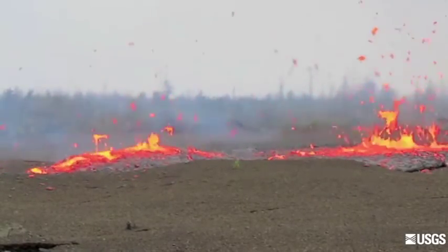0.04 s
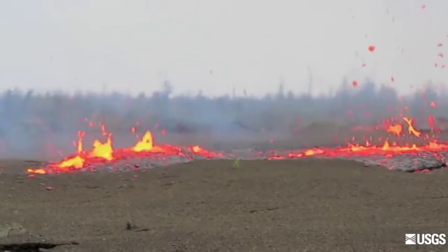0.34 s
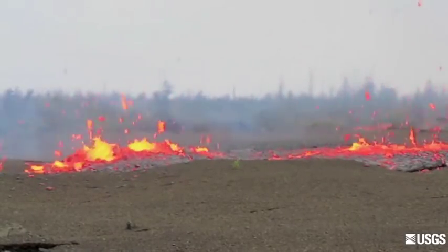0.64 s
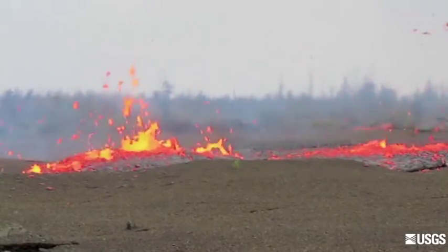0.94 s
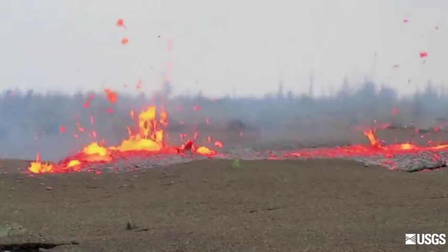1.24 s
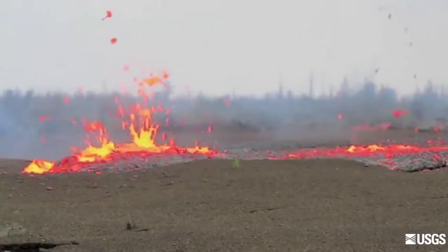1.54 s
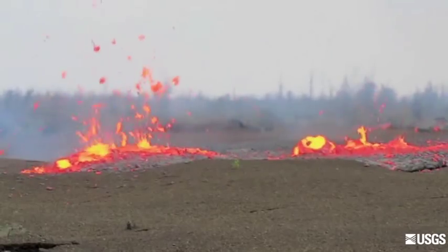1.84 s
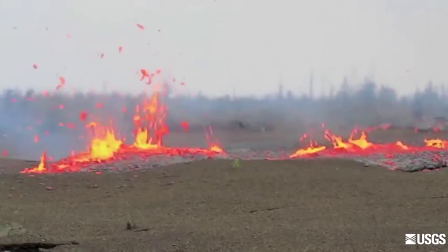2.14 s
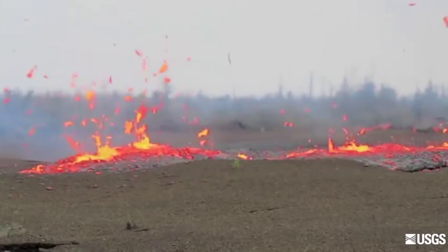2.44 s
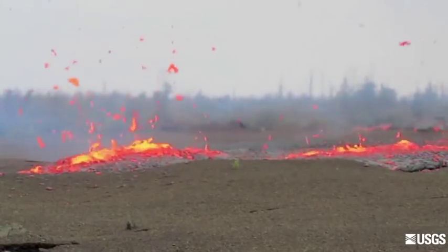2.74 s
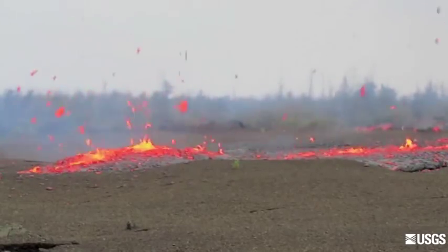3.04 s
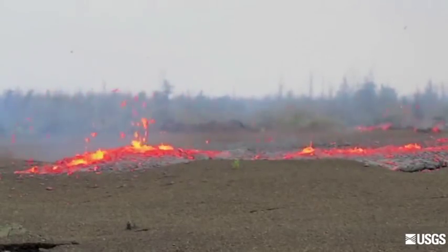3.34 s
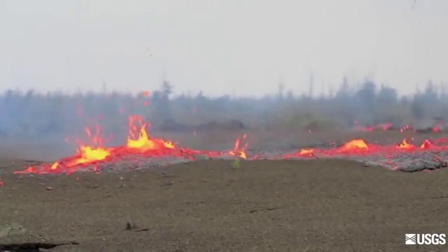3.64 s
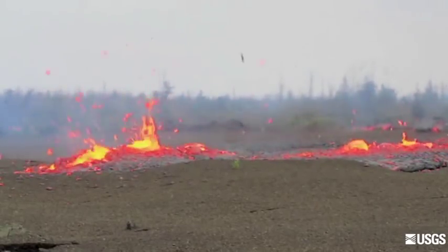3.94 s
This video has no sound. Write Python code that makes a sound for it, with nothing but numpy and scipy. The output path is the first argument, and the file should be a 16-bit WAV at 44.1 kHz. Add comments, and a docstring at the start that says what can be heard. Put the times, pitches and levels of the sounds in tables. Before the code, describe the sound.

Spattering lava roars and hisses from a fissure, with low wind rumble on the microphone.

```python
"""A steady roar of escaping gas, from a lava fissure some way off across open ground.
Each bursting slug adds a short hissing jet; roar and jets are noise, grainy with pops of spatter.
A deep rumble lies underneath, drops away abruptly at 1.4 s and creeps back faintly near the end.
Wind buffets the microphone in low puffs over a faint breeze."""
import sys
import numpy as np
from scipy import signal
from scipy.fft import rfft, irfft
from scipy.io import wavfile

SR = 44100
rng = np.random.default_rng(int(sys.argv[2]) if len(sys.argv) > 2 else 0)


def transcribe(signal):
    """Save signal, clipped to [-1, 1], as a 16-bit WAV file at the path in sys.argv[1]."""
    frames = np.atleast_2d(signal).T
    limited = np.clip(frames, -1, 1)
    pcm = np.round(limited * 32767).astype(np.int16)
    wavfile.write(sys.argv[1], SR, pcm)


N = 4 * SR


def amp(db):
    """Decibels to gain."""
    return 10 ** (np.asarray(db) / 20)


def unit(x):
    """Scales to rms 1."""
    return x / np.sqrt(np.mean(x ** 2) + 1e-20)


def spectrum(points, hz):
    """Gain of an (f/Hz, level/dB) table, interpolated in log frequency."""
    f, db = np.transpose(points)
    return amp(np.interp(np.log(hz + 1), np.log(f + 1), db))


def coloured(x, points):
    """Filters x by an (f/Hz, level/dB) table."""
    return irfft(rfft(x) * spectrum(points, np.fft.rfftfreq(N, 1 / SR)), N)


def hump(hz, centre_hz, fall_db):
    """Gain of a broad band, fall_db down one octave from its centre."""
    return amp(-fall_db * np.log2((hz + 1) / centre_hz) ** 2)


def smooth(x, width, axis):
    """Gaussian blur over a width in steps, scaled to rms 1."""
    n = x.shape[axis]
    kernel = np.exp(-(2 * np.fft.rfftfreq(n) * width) ** 2)
    blurred = irfft(rfft(np.moveaxis(x, axis, -1)) * kernel, n)
    return unit(np.moveaxis(blurred, -1, axis))


def random_field(hz, t, width_hz, width_s):
    """Smooth random pattern over frequency and time, rms 1."""
    drift = smooth(rng.standard_normal((len(hz), len(t))), width_s / t[1], axis=1)
    return smooth(drift, width_hz / hz[1], axis=0)


# Breeze spectrum: f/Hz, level/dB
BREEZE_SPECTRUM = [(15, -16), (35, -12), (90, -10), (200, 6), (400, -4), (900, -14), (3000, -45)]


def breeze(level_db=-61.5):
    """Faint steady air noise, independent in each channel."""
    return amp(level_db) * unit(coloured(rng.standard_normal((2, N)), BREEZE_SPECTRUM))


# Eddies at the microphone: peak t/s, length/s, relative level/dB, centre f/Hz
EDDIES = [(0.164, 0.097, -37, 60), (0.255, 0.08, -45, 120), (0.381, 0.069, -38, 78), (0.504, 0.03, -30, 94),
          (0.598, 0.12, -36, 84), (0.807, 0.055, -37, 67), (0.961, 0.082, -31, 95),
          (0.999, 0.022, -26, 114), (1.132, 0.021, -20, 90.5), (1.211, 0.055, -34, 103),
          (1.374, 0.038, -25, 100), (1.424, 0.02, -28, 108), (1.749, 0.032, -46, 150),
          (1.855, 0.079, -46.5, 162), (1.972, 0.014, -40, 320), (2.082, 0.096, -43, 240),
          (2.158, 0.016, -28, 252), (2.221, 0.1, -46, 180), (2.386, 0.089, -46, 170),
          (2.5, 0.031, -51, 180), (2.603, 0.074, -43, 200), (2.667, 0.078, -43, 192),
          (2.824, 0.068, -35.5, 217), (2.987, 0.036, -38, 220), (3.18, 0.098, -49, 180),
          (3.325, 0.052, -41, 212), (3.424, 0.084, -50, 46), (3.933, 0.099, -52, 63)]


def wind_buffets(gain_db=4.5, common_db=-17.5, size=16384):
    """Each eddy hits the microphone as a short low puff, mostly opposite in the two channels."""
    t = (np.arange(size) - size // 2) / SR
    hz = np.fft.rfftfreq(size, 1 / SR)
    out = np.zeros((2, N + 2 * size))
    for peak_s, length_s, db, centre_hz in EDDIES:
        noise = irfft(rfft(rng.standard_normal((2, size))) * hump(hz, centre_hz, fall_db=5.5), size)
        bell = .5 ** (2 * (t / length_s) ** 2)
        rms = amp(gain_db + db) * np.sqrt(np.mean(bell ** 2))
        opposite, common = [rms * unit(n * bell) for n in noise]
        start = round(peak_s * SR) + size // 2
        out[:, start:start + size] += np.array([opposite, -opposite]) + amp(common_db) * common
    return out[:, size:size + N]


# Rumble envelope: t/s, level/dB
RUMBLE_ENVELOPE = [(0, -28), (.6, -27.5), (1.0, -28.5), (1.375, -27.5), (1.405, -50), (1.44, -40),
                   (1.46, -67), (1.6, -79), (1.72, -64), (1.77, -82), (3.3, -78), (3.38, -56), (3.54, -67),
                   (3.7, -51), (3.93, -42), (4, -41)]
# Rumble spectrum: f/Hz, level/dB
RUMBLE_SPECTRUM = [(15, -26), (30, -8), (55, -6.5), (85, -0.5), (110, -1), (138, 1), (190, -1), (230, -1.5),
                   (262, 2), (310, 0), (450, -4), (620, -4), (900, -17), (1600, -35), (4000, -70)]


def rumble():
    """Deep noise, the same in both channels."""
    level_db = np.interp(np.arange(N) / SR, *np.transpose(RUMBLE_ENVELOPE))
    return unit(coloured(rng.standard_normal(N), RUMBLE_SPECTRUM)) * amp(level_db)


def spatter(pops_per_s=2200, pop_share=0.23, spread_db=2):
    """Turbulent noise mixed with dense pops of tearing lava."""
    sizes = amp(spread_db * np.minimum(rng.exponential(1, N), 4)) * rng.choice([-1, 1], N)
    pops = sizes * (rng.random(N) < pops_per_s / SR)
    return np.sqrt(pop_share) * unit(pops) + np.sqrt(1 - pop_share) * rng.standard_normal(N)


def mottled(x, depth_db=1.14):
    """Lifts and lowers narrow bands at random, drifting slowly over time."""
    hz, t, bands = signal.stft(x, SR, nperseg=2048)
    gain = amp(depth_db * random_field(hz, t, width_hz=70, width_s=0.14))
    return signal.istft(bands * gain, SR, nperseg=2048)[1][:N]


# Vent spectrum across the ground: f/Hz, level/dB
VENT_SPECTRUM = [(30, -64), (70, -46), (130, -30.5), (250, -16.5), (400, -13), (560, -7.5), (740, -2),
                 (1000, -2.5), (1550, -.5), (2000, -4.5), (2600, -5.5), (3350, -8), (3800, -14),
                 (4150, -16), (4700, -12), (5450, -10.5), (6400, -12), (7600, -13.5), (10000, -20),
                 (12200, -28), (14500, -37.5)]
# Stereo side relative to mid: f/Hz, level/dB
VENT_SIDE = [(100, 0), (400, -17.5), (800, -17), (1400, -30), (2200, -22.5), (3100, -51.5), (4300, -15),
             (6000, -19), (8500, -13), (11000, -10), (14000, -28)]


def vent_noise():
    """Distant spatter in stereo; the ground cuts a notch near 4 kHz."""
    mid, side = [unit(coloured(mottled(spatter()), VENT_SPECTRUM)) for _ in range(2)]
    side = coloured(side, VENT_SIDE)
    return [mid + side, mid - side]


# Gas roar: t/s, relative level/dB, tilt above pivot/(dB/octave)
ROAR_ENVELOPE = [(0.0, -0.4, 0.6), (0.2, 0.3, 0.04), (0.7, -0.8, 1.2), (0.9, -1, 0), (1.35, 0.1, -0.84),
                 (1.68, -3.5, 0.64), (1.85, 0, 0.3), (2.02, -0.6, -0.7), (2.2, 0.5, -1.2), (2.32, -2, -0.6),
                 (2.5, -1.4, 0.8), (2.7, -1.5, -0.9), (2.95, 0, -0.3), (3.25, -1.3, -0.6), (3.37, -3, -0.5),
                 (3.52, -2, 1), (3.82, -3.5, 0.5), (4.0, -1.5, 2.7)]
# Roar colour on top of the vent spectrum: f/Hz, level/dB
ROAR_SPECTRUM = [(200, 2.5), (750, 1), (1250, -2.8), (1800, -3.1), (2800, -1.5), (4400, -3), (6600, -2.5),
                 (10000, -3.5)]


def gas_roar(hz, t, gain_db=-0.27, pivot_hz=1000):
    """Power gain (frequency x time) of steadily escaping gas, wavering in level and brightness."""
    times, level_db, tilt = np.transpose(ROAR_ENVELOPE)
    octaves = np.log2(np.maximum(hz / pivot_hz, 1))[:, None]
    gain = amp(gain_db + np.interp(t, times, level_db) + octaves * np.interp(t, times, tilt))
    return (gain * spectrum(ROAR_SPECTRUM, hz)[:, None]) ** 2


# Bursting gas slugs: peak t/s, length/s, relative level/dB, centre f/Hz
SLUG_BURSTS = [(0.063, 0.034, -2.0, 1570), (0.09, 0.018, 2.3, 2380), (0.127, 0.056, 7, 6400),
               (0.28, 0.076, 4, 7300), (0.288, 0.044, 2, 1680), (0.365, 0.027, 4.5, 5970),
               (0.428, 0.018, 0, 4470), (0.55, 0.15, -1.0, 2570), (0.571, 0.02, 3.4, 4630),
               (0.605, 0.022, -1, 4990), (0.68, 0.023, 3, 720), (0.766, 0.043, -0.7, 2760),
               (0.828, 0.049, -1, 6350), (0.941, 0.021, 1, 3420), (1.002, 0.073, -0.5, 4800),
               (1.083, 0.038, 7, 10200), (1.218, 0.039, 1.4, 8000), (1.443, 0.04, -2, 4450),
               (1.586, 0.081, 0.2, 3660), (1.787, 0.1, -3.5, 5040), (1.908, 0.044, 1.2, 5030),
               (1.962, 0.03, 0.8, 5500), (2.084, 0.044, -2.5, 2700), (2.136, 0.031, 3, 5860),
               (2.143, 0.023, 5, 980), (2.166, 0.028, 7, 335), (2.213, 0.061, 4, 3960),
               (2.255, 0.016, -2, 5450), (2.365, 0.017, 0.2, 10650), (2.461, 0.1, 0.0, 1870),
               (2.553, 0.012, 1, 3420), (2.607, 0.038, 1.2, 1960), (2.758, 0.029, 1.5, 5900),
               (2.91, 0.011, 2.5, 4060), (2.975, 0.12, -3.5, 2560), (3.202, 0.026, 5.5, 5060),
               (3.324, 0.021, -8, 4520), (3.414, 0.024, 1.5, 4330), (3.463, 0.038, 4, 5600),
               (3.506, 0.018, 1, 3220), (3.564, 0.25, 1.5, 1540), (3.69, 0.026, 12, 6600),
               (3.739, 0.019, 7, 1510), (3.776, 0.02, 9.5, 5300), (3.878, 0.08, 3.2, 1940),
               (3.987, 0.057, 8, 2200)]


def gas_jets(hz, t, gain_db=0.21):
    """Power gain (frequency x time) of the jets: each slug bursts as a short, broad swell of hiss."""
    power = np.zeros((len(hz), len(t)))
    for peak_s, length_s, db, centre_hz in SLUG_BURSTS:
        band = amp(gain_db + db) * hump(hz, centre_hz, fall_db=2.5)
        swell = (1 + ((t - peak_s) / length_s) ** 2) ** -3  # about length_s wide at half power
        power += np.outer(band ** 2, swell)
    return power


# Fissure, left relative to right: f/Hz, level/dB
LEFT_BALANCE = [(200, -3), (650, -2), (1400, -0.28), (5000, 0), (9000, -0.96), (13000, -0.2)]


def fissure(gain_db=-24, patch_db=1.16, flutter_db=0.44):
    """Roar and jets shape the vent noise, with turbulent patches and a flutter shared by all bands."""
    hz, t, bands = signal.stft(vent_noise(), SR, nperseg=256, noverlap=192)
    power = gas_roar(hz, t) + gas_jets(hz, t)
    patches = random_field(hz, t, width_hz=640, width_s=0.014)
    flutter = smooth(rng.standard_normal(len(t)), 0.015 / t[1], axis=0)  # 15 ms blur
    gain = np.sqrt(power) * amp(gain_db + patch_db * patches + flutter_db * flutter)
    left, right = signal.istft(bands * gain, SR, nperseg=256, noverlap=192)[1][:, :N]
    return np.array([coloured(left, LEFT_BALANCE), right])


def scene():
    """Stereo sum of fissure, rumble, buffets and breeze."""
    return fissure() + rumble() + wind_buffets() + breeze()


def record(dry, cutoff_hz=14550):
    """Steep low-pass band limit."""
    lowpass = signal.firwin(511, cutoff_hz, window=("kaiser", 9), fs=SR)
    return signal.oaconvolve(dry, lowpass[None], "same")


dry = scene()
out = record(dry)
transcribe(out)
```